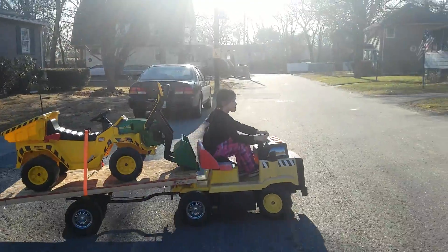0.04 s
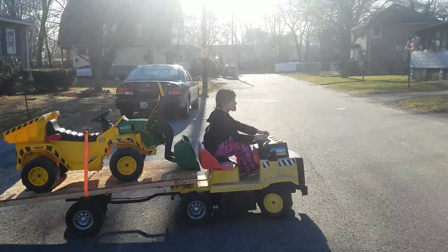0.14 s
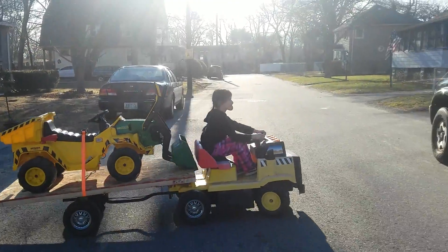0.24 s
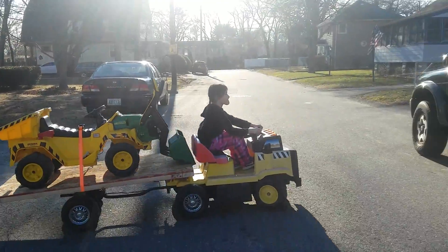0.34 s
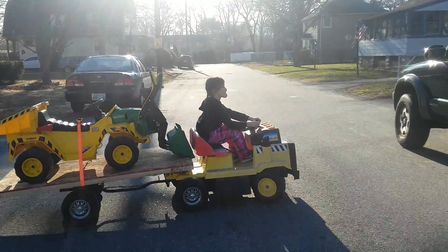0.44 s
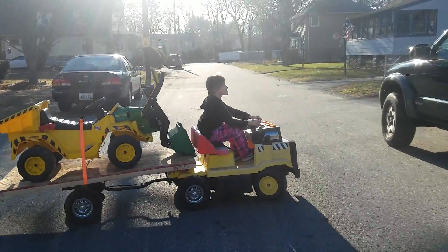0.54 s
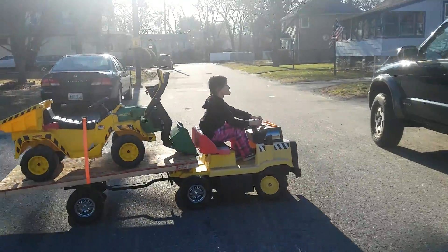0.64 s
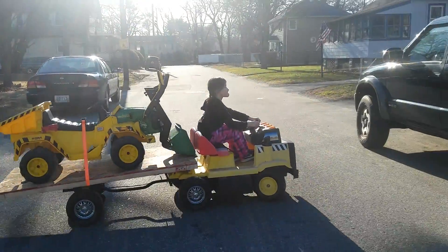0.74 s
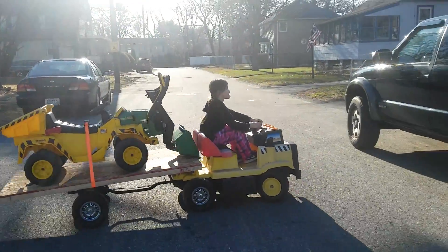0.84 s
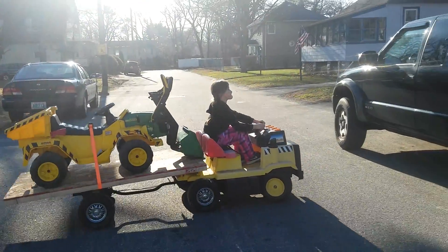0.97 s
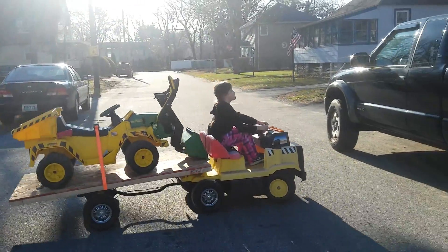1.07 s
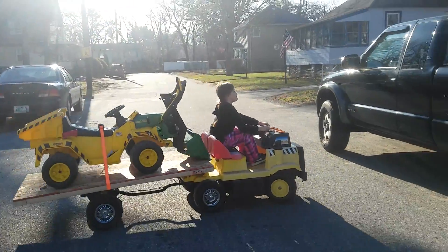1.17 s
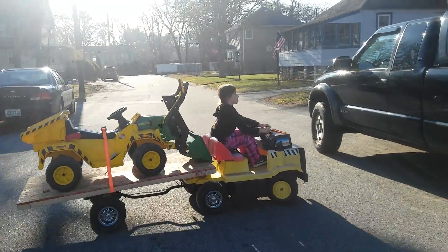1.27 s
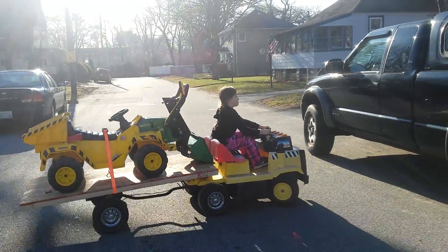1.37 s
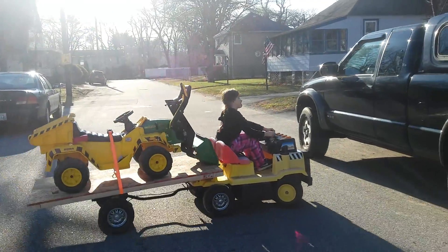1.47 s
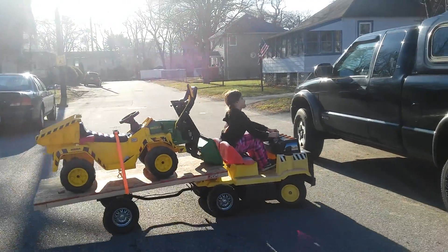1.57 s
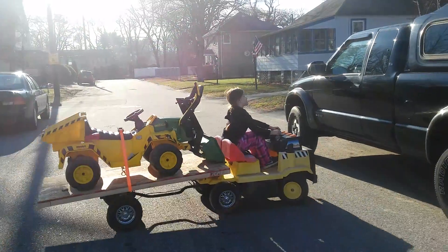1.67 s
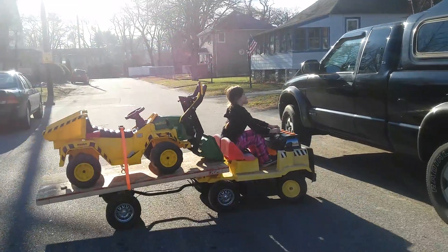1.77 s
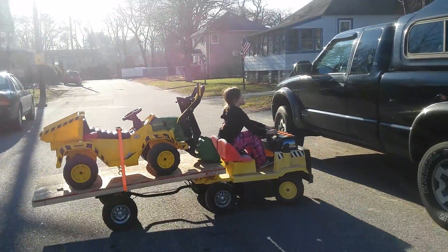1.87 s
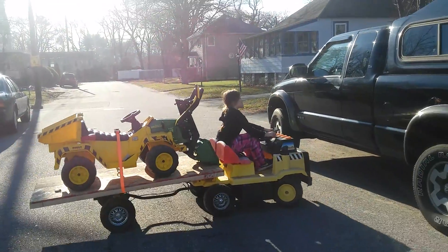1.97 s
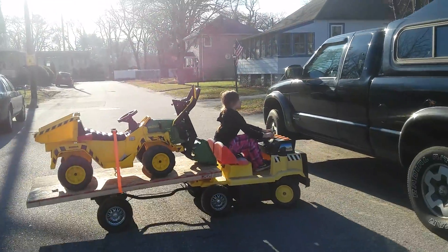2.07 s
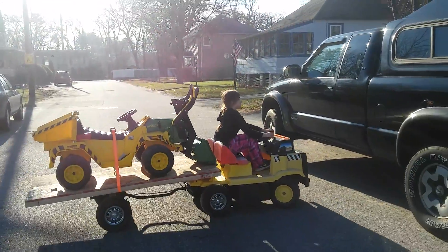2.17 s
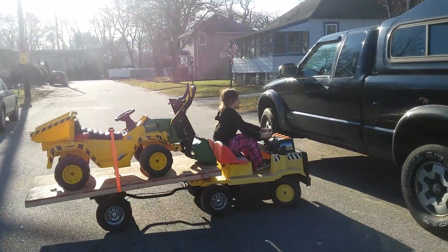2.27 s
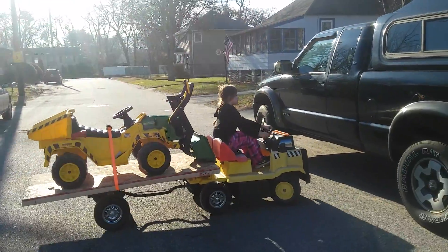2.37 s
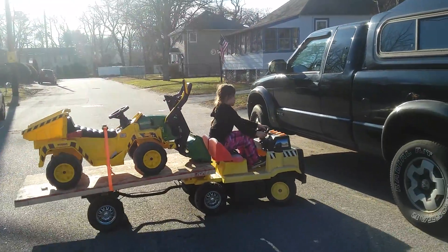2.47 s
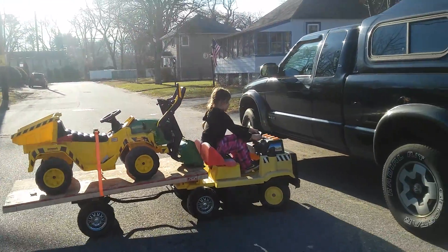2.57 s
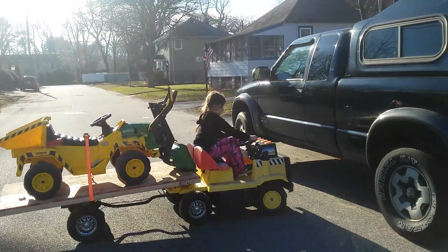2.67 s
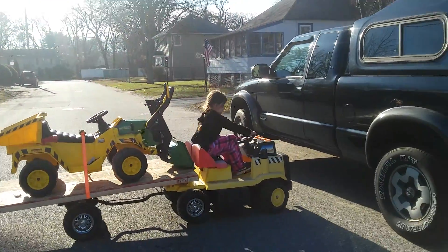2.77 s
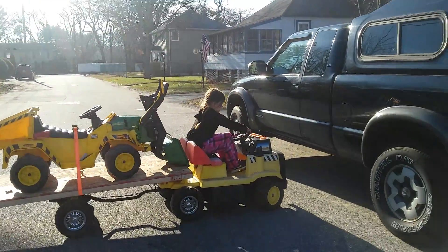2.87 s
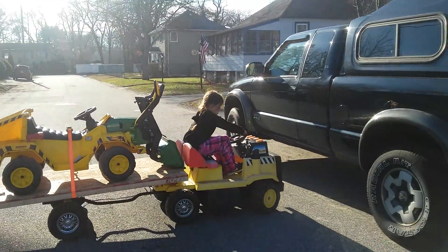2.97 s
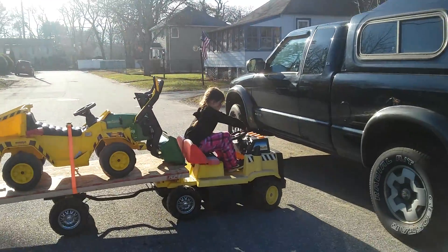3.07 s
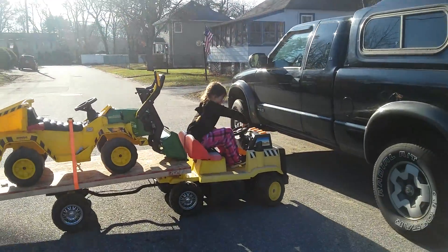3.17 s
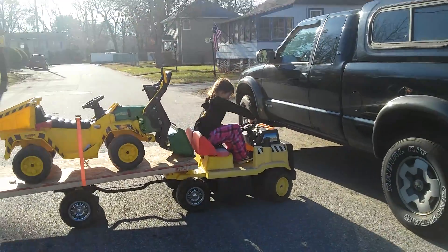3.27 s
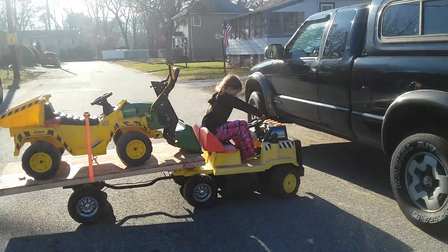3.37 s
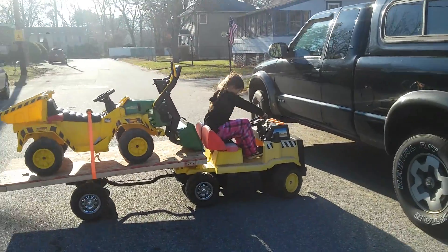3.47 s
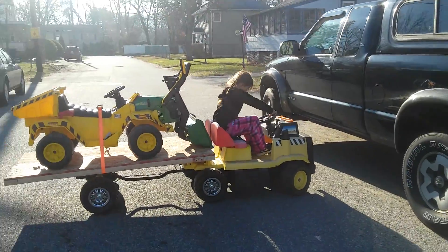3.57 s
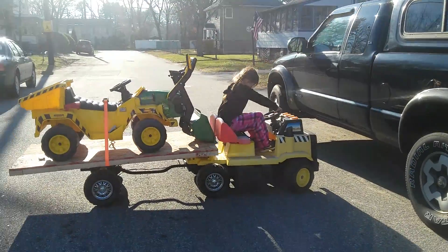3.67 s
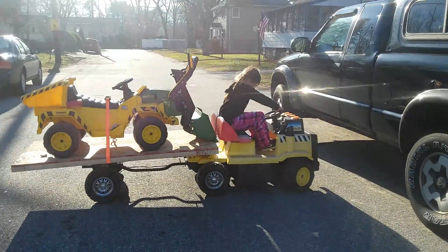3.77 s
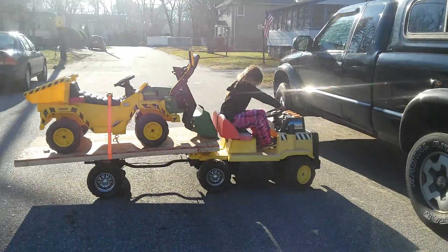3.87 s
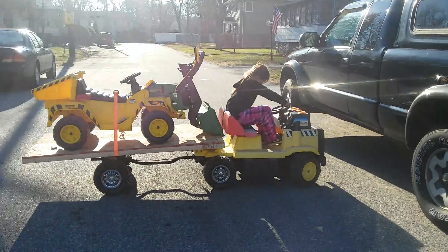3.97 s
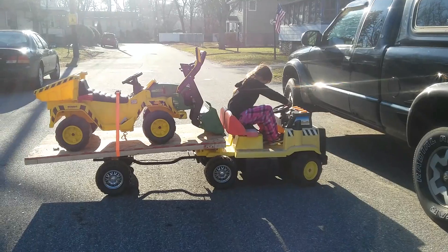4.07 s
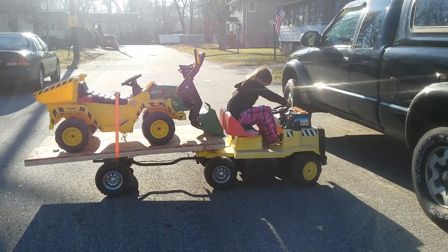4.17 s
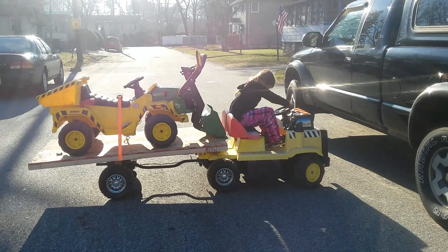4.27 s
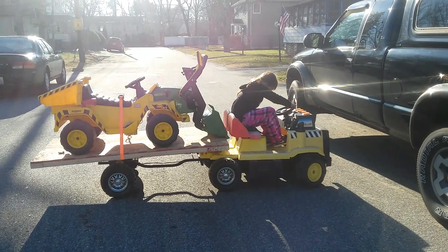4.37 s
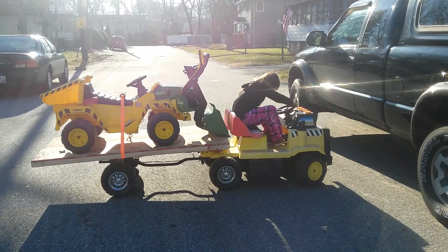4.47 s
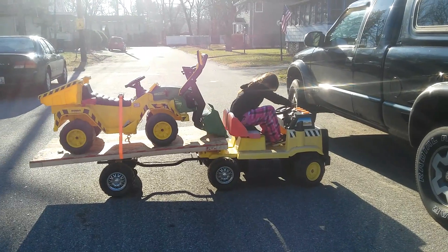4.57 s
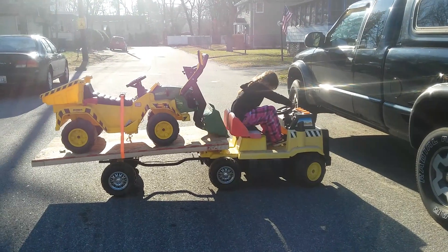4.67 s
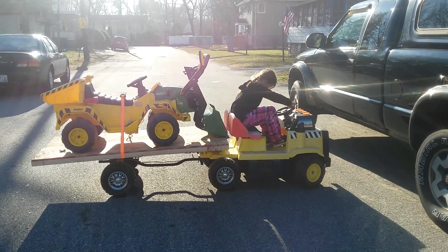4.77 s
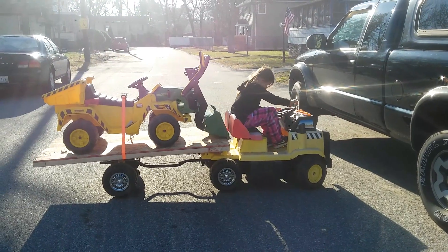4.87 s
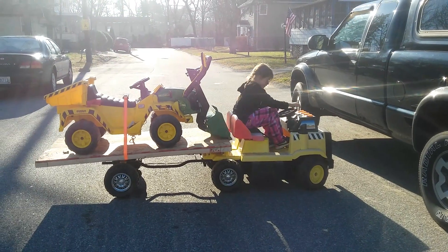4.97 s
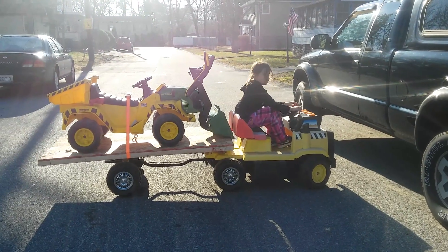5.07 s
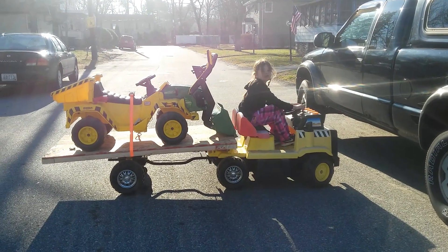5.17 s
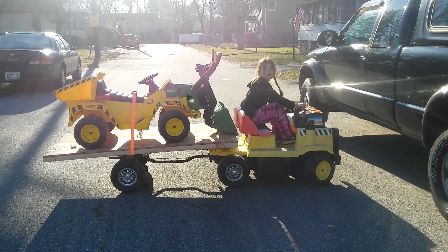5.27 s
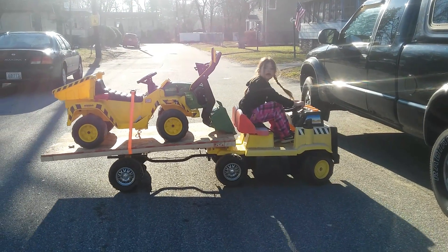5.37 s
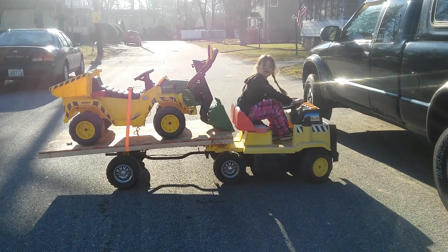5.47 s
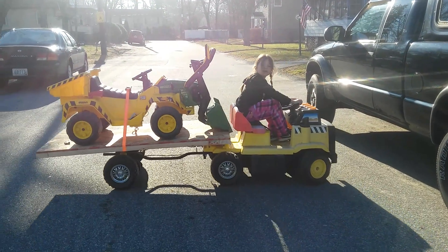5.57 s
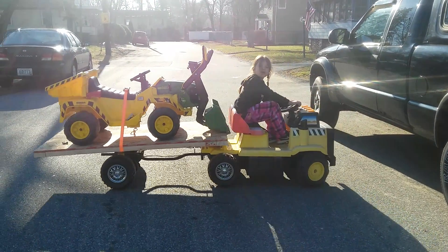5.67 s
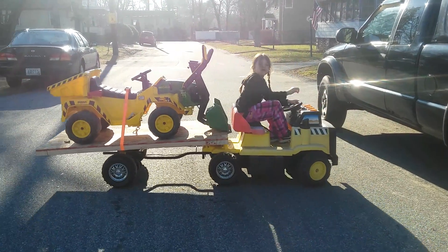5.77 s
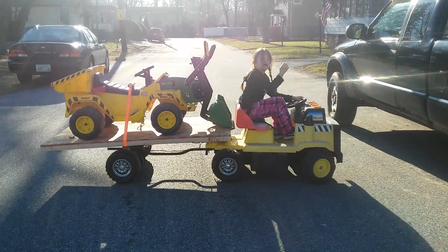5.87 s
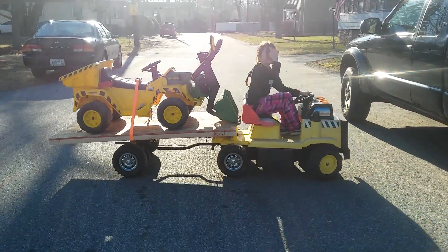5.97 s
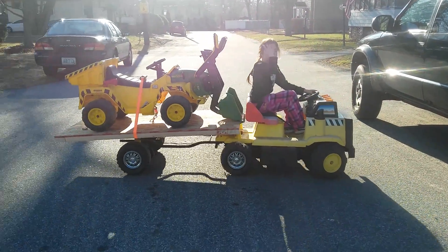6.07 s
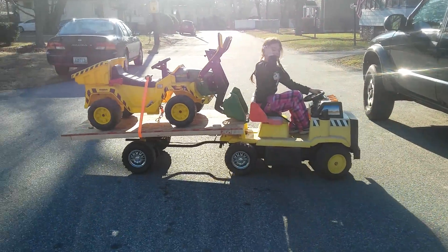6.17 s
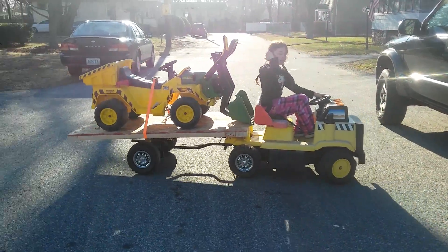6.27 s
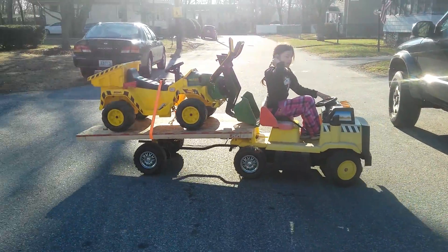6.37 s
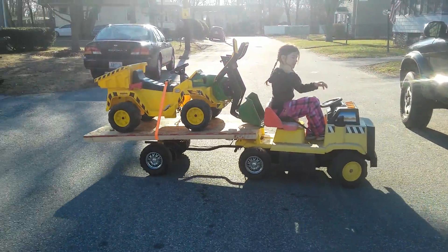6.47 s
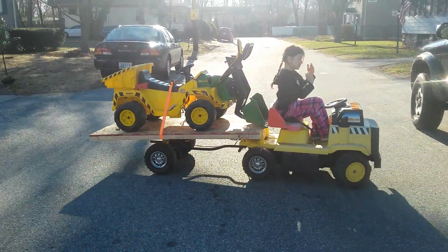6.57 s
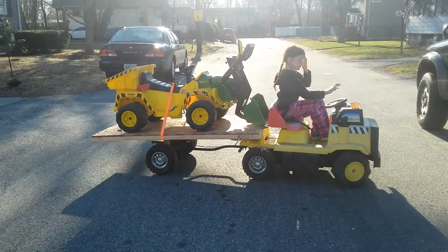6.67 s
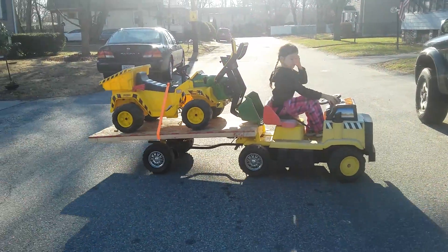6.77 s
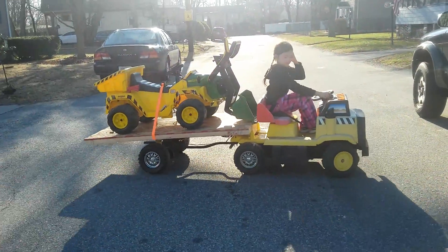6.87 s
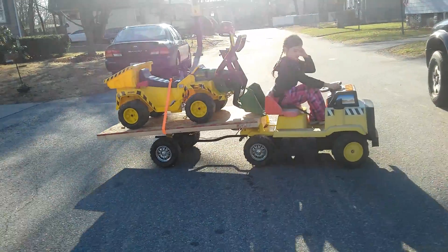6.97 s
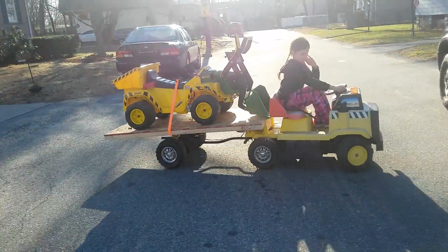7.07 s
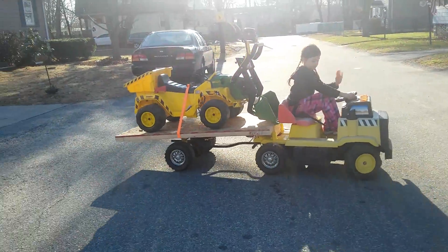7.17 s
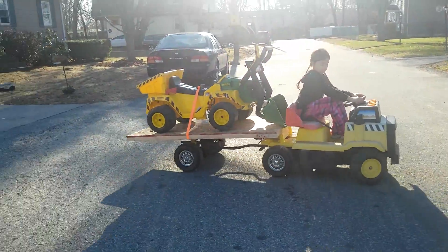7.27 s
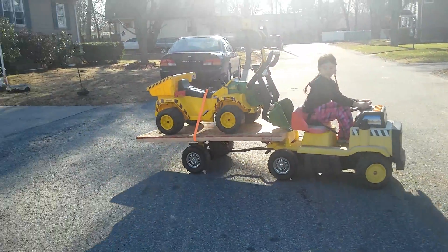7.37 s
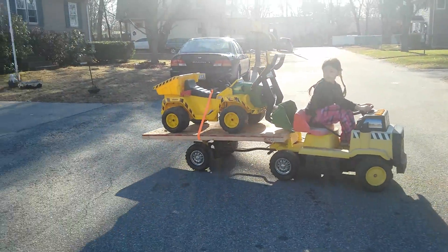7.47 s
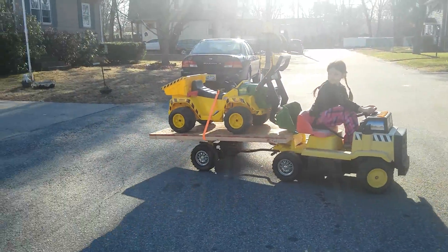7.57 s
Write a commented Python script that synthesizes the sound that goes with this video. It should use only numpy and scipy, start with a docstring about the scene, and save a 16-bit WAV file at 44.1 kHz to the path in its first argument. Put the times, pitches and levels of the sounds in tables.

```python
"""A battery ride-on toy truck with a plank trailer rolls over asphalt, brakes, stands, then backs away.
Random stone kicks drum on hollow plastic wheels; patchy noise makes the gear whir and the grit hiss.
Blurred gliding tones sing from the gearbox; load and hitch click, tick, squeak and knock.
While it stands a far dog, built of rough pulses and breath, barks twice between the houses.
A quiet street of coloured noise with one bird chip lies behind; one microphone hears it all."""
import sys
import numpy as np
from scipy import signal
from scipy.fft import rfft, irfft, next_fast_len
from scipy.io import wavfile
from scipy.ndimage import uniform_filter1d, map_coordinates

SR = 44100
rng = np.random.default_rng(int(sys.argv[2]) if len(sys.argv) > 2 else 0)


def pcm_store(signal):
    """Save signal as 16-bit PCM."""
    levels = np.round(np.clip(np.atleast_2d(signal), -1, 1) * 32767)
    wavfile.write(sys.argv[1], SR, levels.astype(np.int16).T)


N = 336042


def wheels():
    """Stones kick the hollow wheels; the gears and the grit shake with the same bumps."""
    # hollow wheels and tub, going forward and under reverse load:
    # (frequency [Hz], width [Hz], relative level [dB])
    forward_body = [(147.4, 60.1, 3.5), (250.4, 96.2, 0), (449, 204.4, -1.5), (662.7, 230.6, -14),
                    (1490, 1100, -17.5)]
    reverse_body = [(136.5, 49, 3.5), (226, 222.6, -5.5), (555, 47.8, -1.5), (910, 270, -28.5)]
    # colour of gear whir and grit hiss: (frequency [Hz], relative level per Hz [dB])
    whir_colour = [(290, -16), (500, -5), (868, -7), (1180, -5.5), (1760, -10.5), (1920, -11), (2150, -11),
                   (3130, -16), (4120, -22), (7000, -32), (9100, -55.5), (15400, -120)]
    grit_colour = [(1760, -39), (3000, -1), (4110, -1.5), (5000, -3), (9870, -13), (13200, -26.5),
                   (15200, -30), (16000, -30.5)]
    kicks_per_s = 1400

    bumps = .4 * wobble(9)
    kicks = (rng.random(N) < kicks_per_s / SR) * rng.standard_normal(N)
    kicks = kicks * amp(3.136 * rng.standard_normal(N))
    # plastic gives a little under each stone
    kicks = filtered(kicks, lambda hz: 1 / (1 + 1j * hz / 2500) ** 2)

    whir = unit(amp(bumps + 0.95 * wobble(150)) * patchy(whir_colour, patchy_db=1.7734))
    grit_shake = bumps + 1.2 * wobble(25) + 1.4 * wobble(400)
    grit = unit(amp(grit_shake) * patchy(grit_colour, patchy_db=2.0))

    def drumming(body):
        return unit(amp(bumps + 1.2 * wobble(30)) * filtered(kicks, modes(body)))

    forward_drum, reverse_drum = drumming(forward_body), drumming(reverse_body)
    return rolling(forward_drum, reverse_drum, whir, grit) + skid(forward_drum, whir, grit)


def rolling(forward_drum, reverse_drum, whir, grit):
    """Drumming, whir and hiss follow the drive; rough patches lift the drumming and, less, the gears."""
    # rolling forward, creeping after the stop, backing away:
    # (time [s], wheel drumming level before patches [dB], grit hiss level [dB])
    forward = [(0.0, -24.5, -31), (0.62, -21.5, -33.5), (1.02, -24, -34), (1.28, -25.5, -39),
               (1.59, -26, -33.5), (1.71, -28.5, -40.5), (1.95, -31, -42.5), (2.08, -37.5, -48.5),
               (2.26, -38.5, -59.5)]
    creeping = [(2.4, -31, -53), (2.55, -37.5, -54), (2.7, -39.5, -61), (2.85, -41, -75.5),
                (2.95, -42, -64.5), (3.05, -47, -80.5), (3.3, -68, -94.5)]
    reverse = [(5.303, -24.5, -53), (5.36, -37, -54), (5.45, -41.5, -53.5), (5.55, -38, -50.5),
               (5.67, -35.5, -44.5), (5.8, -33.5, -42.5), (6.1, -31.5, -38), (6.6, -33, -38.5),
               (7.1, -30, -39.5), (7.62, -31, -40)]
    # rough patches under the wheels: (time [s], half length to 1/e [s], drumming lift [dB])
    patches = [(0.037, 0.038, 4.5), (0.163, 0.0188, 6), (0.242, 0.0284, 6.5), (0.36, 0.0475, 6.5),
               (0.63, 0.026, 3.5), (0.704, 0.0106, 1.5), (0.749, 0.0272, 7), (0.8, 0.0194, 4.5),
               (0.847, 0.0282, 5), (0.979, 0.0265, 4.5), (1.194, 0.082, 4), (1.472, 0.049, 7.5),
               (1.703, 0.0316, 2), (1.781, 0.0657, 9), (2.035, 0.022, 4.5), (2.517, 0.0295, 4),
               (2.685, 0.0176, 2), (2.938, 0.016, 7.5), (3.143, 0.0172, 15.5), (6.316, 0.0107, 6),
               (6.434, 0.027, 0.5), (6.691, 0.0133, 6), (6.781, .02, -0.5), (7.051, 0.022, 5.5),
               (7.472, 0.031, 3), (7.564, 0.0195, 0)]
    patch_whir = 0.17  # share of the lift that the gears get
    # dB of whir for each dB of drumming, of grit
    whir_with_drum, whir_with_grit = 0.29, 0.578

    t = np.arange(N) / SR
    lift_db = sum(db * np.exp(-((t - s) / half) ** 2) for s, half, db in patches)
    # the gears grind harder while they get the load moving
    start_whir_db = 5 * np.exp(-np.abs(t - reverse[0][0]) / 0.473)

    # whir levels [dB] hold where drumming is at -30 dB and grit at -40 dB
    drives = [(forward, forward_drum, -30.5),
              (creeping, forward_drum, -32.5),
              (reverse, reverse_drum, -32.5 + start_whir_db)]
    out = np.zeros(N)
    for table, drum, base_db in drives:
        drum_db, grit_db, gate = curves(table)
        whir_db = base_db + whir_with_drum * (drum_db + 30) + whir_with_grit * (grit_db + 40)
        layers = amp(drum_db + lift_db) * drum
        layers += amp(whir_db + patch_whir * lift_db) * whir
        layers += amp(grit_db) * grit
        out += gate * layers
    return out


def skid(drum, whir, grit):
    """The wheels drag, then lock: they drum thinly, scrape by stick and slip, and squeal."""
    # drags: (time [s], length before release [s], then starting levels [dB] of
    # drumming before its bass cut, whir, scrape)
    drags = [(2.239, 0.05, -44, -33, -38.5), (2.289, 0.0927, -14.5, -23, -31.5)]
    # how fast drumming, whir and scrape sag: one value each [dB/s]
    sags = (126.5, 19.5, 24.5)
    # slipping squeals: (start [s], end [s], start pitch [Hz], end pitch [Hz], relative level [dB])
    squeals = [(2.25, 2.29, 1201, 1400, -33.5), (2.256, 2.296, 4900, 5200, -40.5),
               (2.295, 2.34, 4100, 3693, -35), (2.335, 2.369, 4000, 4410, -30),
               (2.34, 2.386, 4900, 5790, -34.5), (2.365, 2.405, 3600, 3696, -30.5)]
    slip_db, slips_per_s = 1.62, 160
    scrape_hz, low_cut_hz = 8200, 100

    # a locked wheel scrapes duller than it rolls
    dull_grit = filtered(grit, lambda hz: 1 / (1 + (hz / scrape_hz) ** 2))
    scrape = unit(amp(slip_db * wobble(slips_per_s)) * dull_grit)
    # a locked wheel drums without its lowest notes
    thin_drum = filtered(drum, lambda hz: (1j * hz / (1j * hz + low_cut_hz)) ** 2)

    out = np.zeros(N)
    for s, end, start_hz, end_hz, db in squeals:
        glide = [(s, start_hz, db), (end, end_hz, db)]
        out += fuzzy(glide, blur_hz=900, waver_hz=60, flutter_db=2)
    for s, length, *levels in drags:
        gain, since = held(s, length, attack=0.0135, release=0.0552)
        for db, sag, layer in zip(levels, sags, (thin_drum, whir, scrape)):
            out += gain * amp(db - sag * since) * layer
    return out


def motor():
    """Gear mesh follows the shaft speed, a second stage winds above it, and the gearbox sings in strands."""
    # backing away, pitch of the gear mesh, of the next gear pair and of a broad ring under the strands:
    # (time [s], pitch [Hz], relative level [dB])
    mesh = [(5.33, 479.6, -51), (5.38, 580.5, -44), (5.45, 725.4, -39.5), (5.5, 860, -36),
            (5.6, 1149, -40.5), (5.69, 1410, -35.5), (5.87, 1441, -34.5), (6.2, 1460, -36.5),
            (6.4, 1480, -42), (6.72, 1389, -42.5), (7.0, 1299, -45), (7.33, 1301, -42), (7.62, 1338, -46.5)]
    second_stage = [(5.29, 1400, -46.5), (5.4, 1499, -44), (5.47, 1702, -45), (5.57, 1800, -43),
                    (5.66, 1881, -42.5), (5.8, 1880, -45.5), (6.1, 1870, -49.5)]
    gear_case = [(5.45, 3698, -58), (5.8, 3600, -48), (6.4, 3402, -43), (7.62, 3400, -43)]
    # gearbox strands, silent where the end precedes the start:
    # (start [s], end [s], start pitch [Hz], end pitch [Hz], relative level at the middle [dB])
    strands = [(0, .3, 3720, 3850, -40), (0.29, .68, 3820, 3850, -41), (0, .55, 3080, 3100, -39.5),
               (1.84, 1.9, 3500, 3800, -43), (5.5, 5.56, 860, 930, -38), (5.5, 5.88, 900, 860, -42),
               (5.5, 5.42, 3740, 3650, -52.5), (5.5, 5.72, 2540, 2550, -45.5), (5.5, 5.7, 3780, 3720, -42),
               (6, 5.92, 3760, 3690, -39.5), (5.5, 5.92, 2700, 2550, -43), (6, 6.2, 3800, 3800, -42),
               (6, 6.45, 3800, 3750, -41.5), (5.5, 6.05, 3050, 3130, -42.5), (6.5, 6.42, 3020, 3080, -41.5),
               (6.5, 6.7, 3100, 3030, -41.5), (6.5, 6.8, 2550, 2500, -47), (6.5, 6.55, 3660, 3650, -39.5),
               (5.5, 6.64, 3460, 3400, -38.5), (7, 6.78, 3740, 3500, -41), (7, 6.94, 3520, 3490, -38.5),
               (7, 7.1, 3430, 3500, -39.5), (7, 7.3, 3480, 3580, -41), (7.5, 7.34, 3150, 3050, -43.5),
               (7, 7.48, 3260, 3200, -41), (7.5, 7.56, 3820, 3750, -42.5), (7.5, 7.66, 3330, 3300, -43.5),
               (5.88, 6.36, 560, 555, -40), (6.42, 7.05, 530, 570, -42), (7.0, 7.66, 540, 555, -42)]
    strand_fade_db = 4.5  # weaker at the ends, but not at a start at zero

    out = fuzzy(mesh, blur_hz=125, waver_hz=22, flutter_db=3)
    out += fuzzy(second_stage, blur_hz=150, waver_hz=25, flutter_db=3)
    out += fuzzy(gear_case, blur_hz=1300, waver_hz=100, flutter_db=1.5)
    for s, end, start_hz, end_hz, db in strands:
        strand = [(s, start_hz, db - strand_fade_db * (s > 0)),
                  ((s + end) / 2, (start_hz + end_hz) / 2, db),
                  (end, end_hz, db - strand_fade_db)]
        out += fuzzy(strand, blur_hz=110, waver_hz=36, flutter_db=2.5)
    return out


def rattles():
    """Loose hard parts of the truck, hitch and load strike and rub."""
    return clicks() + ticks() + knocks() + lever_buzz() + squeaks()


def clicks():
    """Each hitch or load click is a crack, a bright rattle burst and a dull body burst."""
    # clicks: (time [s], then relative levels [dB] of crack, rattle, body)
    hits = [(0.0691, -4, -14.5, -36.5), (.4026, -1.5, -16, -21), (.414, -13, -24, -26),
            (0.7195, -6.5, -12, -18), (0.8827, -7, -18.5, -24.5), (1.6633, -8.5, -15, -26),
            (2.007, -18.5, -31.5, -39), (2.039, -31.5, -29.5, -39), (2.096, -25, -41, -32.5),
            (2.124, -24.5, -40.5, -31.5), (2.4517, -29.5, -34, -35.5), (2.495, -31, -36.5, -35.5),
            (2.536, -35, -43, -35), (2.581, -20, -39, -33.5), (2.5903, -11, -23, -22.5),
            (2.655, -42, -44, -41.5), (2.6981, -38, -44, -44.5), (2.773, -32, -40.5, -42.5),
            (2.883, -43, -43.5, -47), (2.899, -25.5, -31, -28.5), (2.934, -52, -45, -49.5),
            (3.406, -52.5, -58, -44.5), (4.192, -55, -62, -45), (4.203, -56, -63.5, -43.5),
            (4.448, -43, -43.5, -43), (4.463, -38.5, -48, -34.5), (4.4765, -38, -29.5, -33),
            (4.483, -35.5, -30, -20.5), (5.184, -54, -58, -51.5), (5.199, -60.5, -66.5, -54.5),
            (5.294, -54.5, -59.5, -40.5), (5.4168, -40, -48, -43), (5.557, -26, -28.5, -26.5),
            (5.585, -36, -41.5, -32), (5.638, -37.5, -37.5, -37), (5.7724, -5.5, -20, -35.5),
            (5.8327, -14.5, -22.5, -27), (6.1155, -19, -28.5, -31), (6.3885, -18, -28.5, -41),
            (6.307, -30, -35.5, -24.5), (7.034, -34, -40.5, -26), (7.3835, -14.5, -32, -40),
            (7.5978, -12.5, -23, -39.5)]
    # colour of crack and rattle, and of the body: (frequency [Hz], relative level per Hz [dB])
    clack = [(1500, -27), (2500, 3.5), (3500, -3), (5000, -3), (7000, -9), (10000, -11.5), (13000, -25),
             (16000, -33)]
    thwack = [(300, -19.5), (600, -6), (1300, -1), (2200, -5.5), (3200, -16.5), (5000, -36), (9000, -58.5)]
    # the bright part comes back off a near car side: (delay [s], level against the direct sound [dB])
    rebound = (.0066, -8)

    bright, dull = np.zeros(N), np.zeros(N)
    crack = np.array([1.3, 0, 0, -.5, -.6])  # push and rebound
    for s, db, rattle_db, body_db in hits:
        add(bright, s, amp(db) * crack)
        add(bright, s, 0.724 * amp(rattle_db) * noise_burst(t60=0.0572))
        add(dull, s, 1.1 * amp(body_db) * noise_burst(t60=0.084))
    delay_s, rebound_db = rebound
    car_side = lambda hz: 1 + amp(rebound_db) * np.exp(-2j * np.pi * hz * delay_s)
    return filtered(filtered(bright, colour(clack)), car_side) + filtered(dull, colour(thwack))


def ticks():
    """Straps and buckles tick as soft-edged bursts of bright noise."""
    # ticks: (time [s], relative level [dB])
    hits = [(.298, -26.5), (1.818, -34.5), (1.845, -40.5), (1.972, -34.5), (1.99, -33.5), (2.006, -28.5),
            (2.039, -30), (2.096, -47.5), (2.117, -41), (2.13, -45), (2.327, -28.5), (2.352, -31.5),
            (2.375, -35), (5.337, -43.5), (5.366, -40.5), (5.415, -39.5), (5.434, -43.5), (5.455, -47),
            (7.219, -26), (7.37, -35.5), (7.381, -27.5)]
    # colour of the ticks: (frequency [Hz], relative level per Hz [dB])
    tinkle = [(3000, -29), (6000, -5), (8500, 0), (11000, -5.5), (13000, -19), (16000, -19)]

    out, t = np.zeros(N), np.arange(SR // 4) / SR
    soft_edge = 1 - np.exp(-t / 0.0046)
    for s, db in hits:
        add(out, s, amp(db) * soft_edge * noise_burst(t60=0.061))
    return filtered(out, colour(tinkle))


def knocks():
    """Lever, pedal and plank ring hollow at their pitch and two neighbours; low knocks ring longer."""
    # knocks: (time [s], relative level [dB], pitch [Hz])
    hits = [(.738, -10, 449), (.754, -7, 480), (.798, -11, 396), (0.836, -8.5, 248), (1.457, -7, 590),
            (2.292, 3.5, 637.4), (2.302, -8.5, 192.5), (2.742, -13, 833), (2.875, -28.5, 193),
            (3.129, -23, 535), (3.52, -35, 191), (4.19, -13.5, 627), (4.203, -24.5, 577),
            (4.304, -32.5, 707), (4.456, -25, 540), (4.466, -17, 478), (4.482, -7.5, 549.6),
            (4.504, -16.5, 426.7), (5.169, -39.5, 503), (5.186, -30, 244.8), (5.309, -10.5, 471.6),
            (5.3125, -11, 397), (5.317, -13, 237.6), (6.308, -15, 519), (7.036, -14.5, 477)]

    out, t = np.zeros(N), np.arange(SR // 4) / SR
    for s, db, hz in hits:
        phase = 2 * np.pi * hz * t
        ring = np.sin(phase) + 0.183 * np.sin(1.698 * phase) + .5 * np.sin(0.5996 * phase)
        t60 = 0.0332 * (500 / hz)  # seconds
        add(out, s, amp(db - 3.0 - 60 * t / t60) * ring * (1 - np.exp(-t / 0.001)))
    return out


def lever_buzz():
    """After the shift the lever buzzes in blurred tones that lose 4 dB on the way."""
    # the buzz: (start [s], end [s], [(pitch [Hz], relative level [dB])])
    lever = (4.52, 4.68, [(800, -56), (3200, -70)])

    s, end, tones = lever
    out = np.zeros(N)
    for hz, db in tones:
        out += fuzzy([(s, hz, db), (end, hz, db - 4)], blur_hz=hz / 10, waver_hz=10, flutter_db=2)
    return out


def squeaks():
    """The load squeaks in short gliding tones with a rough edge."""
    # squeaks: (time [s], length [s], start pitch [Hz], end pitch [Hz], relative level [dB])
    rubs = [(0.279, 0.042, 4100, 4550, -31.5), (.62, 0.068, 5800, 5940, -37.5),
            (.72, 0.102, 6000, 5740, -37), (.88, .15, 5700, 5590, -40.5), (1.099, 0.052, 2900, 2255, -30.5),
            (1.136, 0.035, 2120, 1950, -35.5), (1.182, 0.058, 4900, 5130, -35),
            (1.234, 0.048, 3600, 4090, -27.5), (1.295, 0.043, 4750, 4950, -36.5),
            (1.361, .04, 2440, 2355, -32.5), (1.425, 0.036, 6100, 5910, -35),
            (1.445, 0.032, 2900, 2300, -31), (1.48, 0.07, 5850, 4347, -31.5),
            (1.484, 0.041, 2700, 2798, -29.5), (4.444, 0.0214, 3030, 3050, -46.5),
            (5.69, 0.087, 3870, 3938, -31.5)]

    out = np.zeros(N)
    for s, length, start_hz, end_hz, db in rubs:
        roughness = 1 + .45 * wobble(500, size=round(length * SR))
        add(out, s, chirp(length, start_hz, end_hz, db) * roughness)
    return out


def dog():
    """Hoarse barks: rough pulses and breath through the muzzle, dulled by distance and trailed by echo."""
    # barks: (time [s], length before release [s], first pitch [Hz], relative level [dB])
    barks = [(2.914, 0.075, 1069, -40), (3.593, 0.1053, 1075, -39)]
    # throat and mouth resonances: (frequency [Hz], width [Hz], relative level [dB])
    muzzle = [(807, 150, 3), (986, 268, 14.5), (1430, 500, -1.5), (1840, 140, 3), (2370, 530, 1.5)]
    sag_hz_per_s = 1250

    # distance takes the treble, and the bass is thin
    far = lambda hz: modes(muzzle)(hz) / (1 + (hz / 2700) ** 8) / (1 + (650 / (hz + 1)) ** 6)
    out = np.zeros(N)
    for s, length, first_hz, db in barks:
        gate, since = held(s, length, attack=.03, release=.04)
        hz = first_hz - sag_hz_per_s * since
        cycle = np.cumsum(hz * (1 + 0.04 * wobble(140))) / SR % 1
        pulses = np.sin(2 * np.pi * cycle) * amp(3 * wobble(60))
        breath = 2.1 * rng.standard_normal(N) * amp(2.5 * wobble(45))
        # the root spreads the level over the bark's length instead of the whole scene
        bark = amp(db) * unit(gate * filtered(pulses + breath, far)) * np.sqrt(length * SR / N)
        out += 1.02 * bark + 0.904 * echoes(bark, t60_scale=0.97)
    return out


def street():
    """Far traffic and air as slowly swelling coloured noise, with one bird chip."""
    # colour of the street: (frequency [Hz], relative level per Hz [dB])
    air = [(15, -66.5), (25, -29), (38, -31.5), (68, -8), (87, -3), (157, -9.5), (591, -20.5), (677, -19.5),
           (1480, -29.5), (1610, -27.5), (1740, -30), (3340, -37.5), (5000, -51.5), (11000, -49),
           (16000, -47)]
    # swell of the far traffic: (time [s], level [dB])
    swell = [(0, -48), (3.3, -49), (3.9, -51), (4.4, -53), (4.6, -47.5), (4.9, -51.5), (5.3, -50.5),
             (7.62, -47)]
    # bird chip: (time [s], length [s], start pitch [Hz], end pitch [Hz], level [dB])
    bird = (4.068, .03, 6500, 7400, -68)

    out = amp(curves(swell)[0] + .6 * wobble(3.675)) * patchy(air, patchy_db=1.5)
    add(out, bird[0], chirp(*bird[1:]))
    return out


def echoes(x, t60_scale):
    """The house fronts answer with a noise tail; each frequency dies at its own speed."""
    # echo decay: (frequency [Hz], 60 dB decay time before t60_scale [s])
    houses = [(500, 1.25), (1000, 0.935), (2500, 0.91), (8000, 0.087)]

    hz, t, z = signal.stft(rng.standard_normal(SR), SR, nperseg=256)
    t60 = t60_scale * along(houses, hz)[:, None]
    tail = signal.istft(z * amp(-60 * t / t60), SR, nperseg=256)[1]
    return signal.fftconvolve(x, tail / np.linalg.norm(tail))[:N]


def fuzzy(table, blur_hz, waver_hz, flutter_db):
    """A blurred tone: load makes it waver, tooth errors scatter size and phase into a narrow noise band."""
    hz, db, gate = curves(table)
    on, out = gate > 0, np.zeros(N)
    chance = lambda rate: wobble(rate, size=on.sum())
    phase = 2 * np.pi * np.cumsum(hz[on] + waver_hz * chance(22)) / SR
    band = chance(blur_hz) * np.sin(phase) + chance(blur_hz) * np.cos(phase)
    out[on] = gate[on] * amp(db[on] + flutter_db * chance(28)) * band
    return out


def patchy(spectrum, patchy_db):
    """Coloured noise of rms 1 with patches of random gain in time and frequency."""
    z = signal.stft(rng.standard_normal(N + 512), nperseg=512)[2]
    field = uniform_filter1d(rng.standard_normal(z.shape), size=5, axis=0)
    field = uniform_filter1d(field, size=10, axis=1)
    x = signal.istft(z * amp(patchy_db * unit(field)), nperseg=512)[1][:N]
    return unit(filtered(x, lambda hz: amp(along(spectrum, hz))))


def noise_burst(t60):
    """A quarter second of white noise with a quick rise and a 60 dB fall in t60 seconds."""
    t = np.arange(SR // 4) / SR
    return amp(-60 * t / t60) * (1 - np.exp(-t / 0.0015)) * rng.standard_normal(len(t))


def chirp(length, start_hz, end_hz, db):
    """A short gliding tone that swells and fades."""
    hz = np.linspace(start_hz, end_hz, round(length * SR))
    return amp(db) * np.hanning(len(hz)) * np.sin(2 * np.pi * np.cumsum(hz) / SR)


def modes(table):
    """Causal response of (frequency [Hz], width [Hz], level [dB]) resonances with alternating signs."""
    def response(f):
        total = 0
        for k, (center, width, db) in enumerate(table):
            ring = 1j * f * width / (center * center - f * f + 1j * f * width)
            total = total + (-1) ** k * amp(db) * ring
        return total
    return response


def colour(spectrum):
    """Filter response of a spectrum, scaled to rms 1 over frequency."""
    return lambda hz: unit(amp(along(spectrum, hz)))


def filtered(x, response):
    """x times a complex response of frequency."""
    m = next_fast_len(N + SR // 2)
    return irfft(rfft(x, m) * response(np.fft.rfftfreq(m, 1 / SR)), m)[..., :N]


def wobble(rate, size=N):
    """A smooth random curve, rate knots a second."""
    knots = rng.standard_normal(int(size * rate / SR) + 4)
    return map_coordinates(knots, [np.arange(size) * rate / SR])


def curves(rows):
    """One value per sample for each column, and a gate that is open inside the table."""
    s, *cols = np.transpose(rows)
    t = np.arange(N) / SR
    # 20 ms fades, except at the very start and end of the scene
    since_start = t - s[0] + (s[0] <= 0)
    until_end = s[-1] - t + (s[-1] >= t[-1])
    gate = np.clip(np.minimum(since_start, until_end) / .02, 0, 1)
    return [np.interp(t, s, c) for c in cols] + [gate]


def held(s, length, attack, release):
    """Attack, hold, release as a gain, and the seconds since the start."""
    t = np.arange(N) / SR - s
    gain = np.clip(np.minimum(t / attack, 1 + (length - t) / release), 0, 1)
    return gain, np.clip(t, 0, length + release)


def along(points, hz):
    """(frequency [Hz], value) points read on a log frequency axis."""
    f, v = np.transpose(points)
    return np.interp(np.log(hz + 1), np.log(f + 1), v)


def add(track, s, sound):
    """Mix a sound into a track at s seconds."""
    part = track[round(s * SR):][:len(sound)]
    part += sound[:len(part)]


def amp(db):
    """Gain of a level in dB."""
    return 10 ** (np.asarray(db) / 20)


def unit(x):
    """x at rms 1."""
    return x / np.sqrt(np.mean(x ** 2) + 1e-20)


def scene():
    """Everything reaches one microphone; the small truck radiates no deep bass."""
    hits = rattles()
    late_hits = np.pad(hits, (400, 0))  # samples on the way to the houses and back
    truck = wheels() + motor() + hits + amp(-18.5) * echoes(late_hits, t60_scale=0.14)
    truck = filtered(truck, lambda hz: (1j * hz / (1j * hz + 58)) ** 4)
    mono = truck + dog() + street()
    return np.array([mono, mono])


def record(dry):
    """The recorder keeps nothing above its 16 kHz band limit."""
    return filtered(dry, lambda hz: hz < 16000)


dry = scene()
out = record(dry)
pcm_store(out)
```